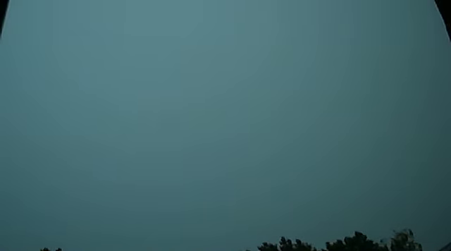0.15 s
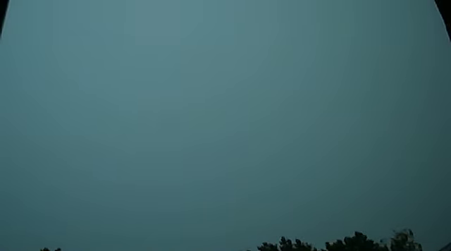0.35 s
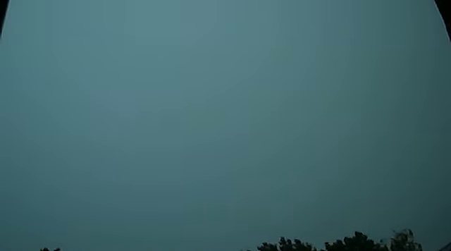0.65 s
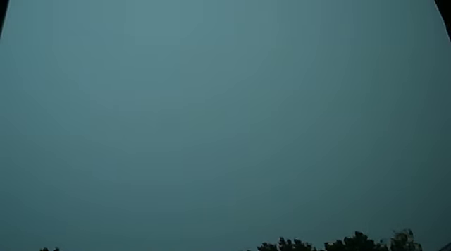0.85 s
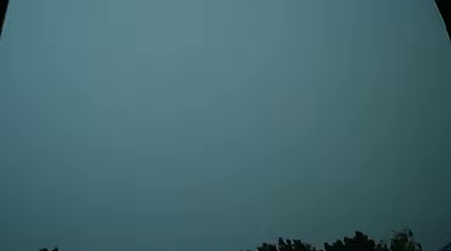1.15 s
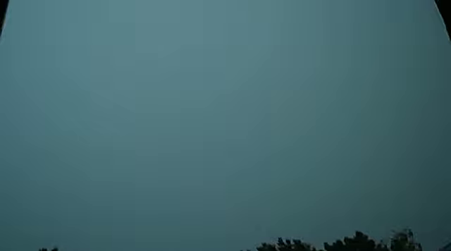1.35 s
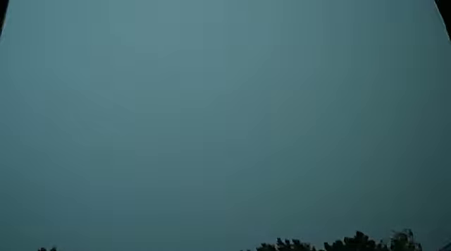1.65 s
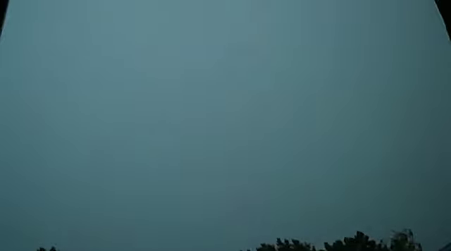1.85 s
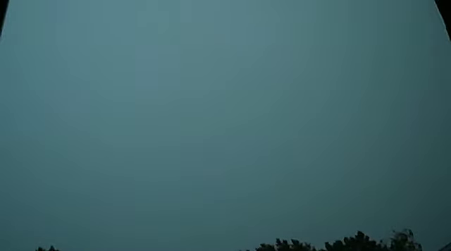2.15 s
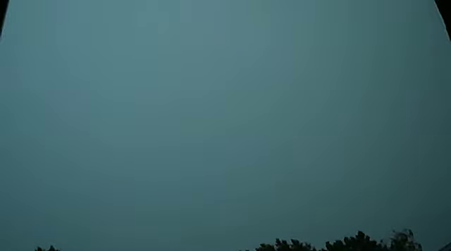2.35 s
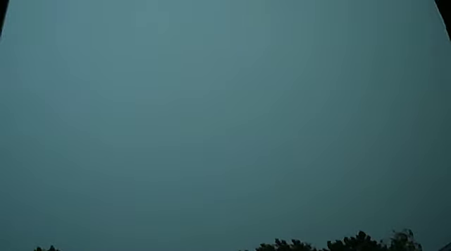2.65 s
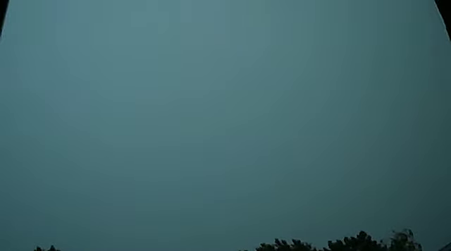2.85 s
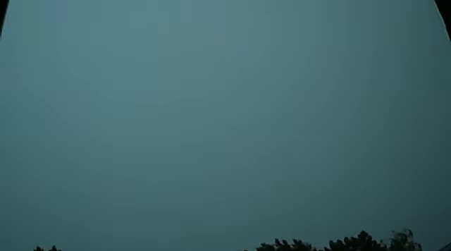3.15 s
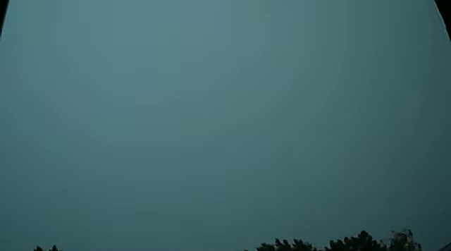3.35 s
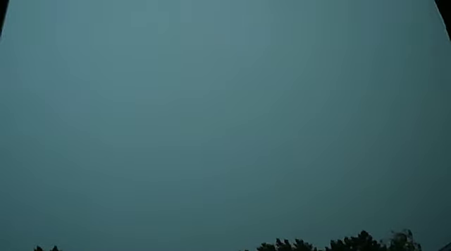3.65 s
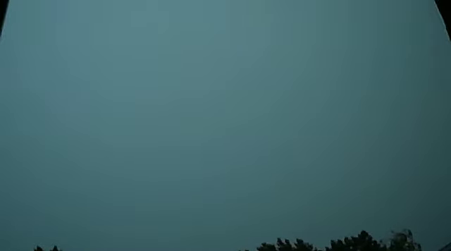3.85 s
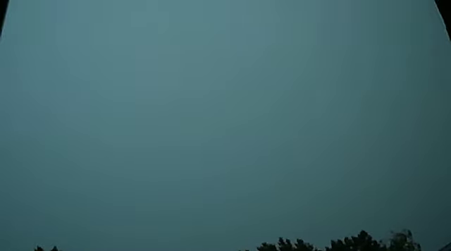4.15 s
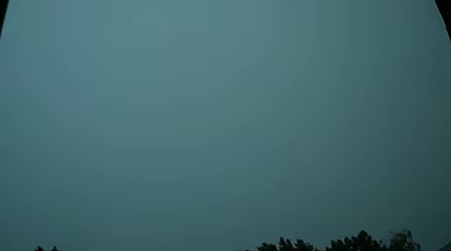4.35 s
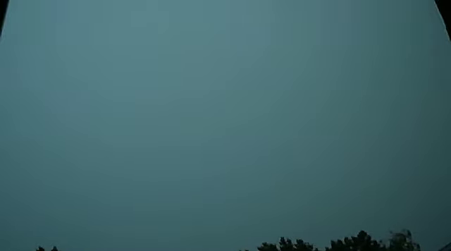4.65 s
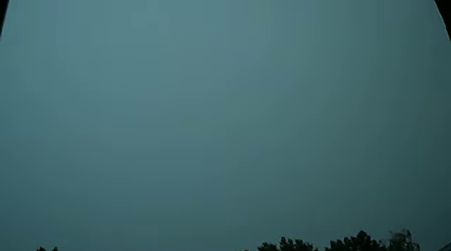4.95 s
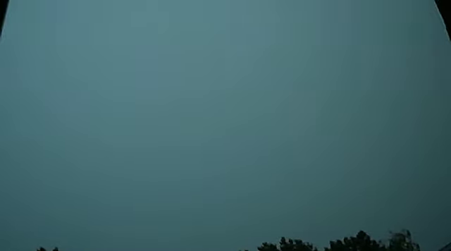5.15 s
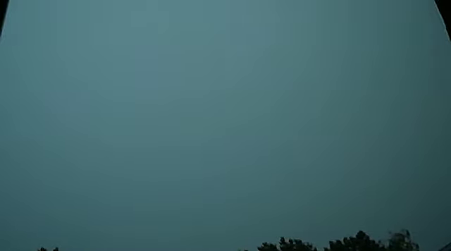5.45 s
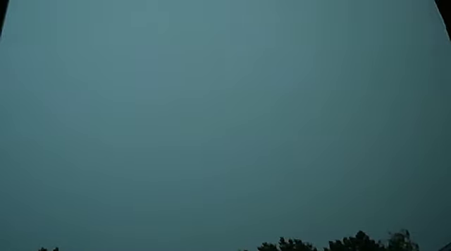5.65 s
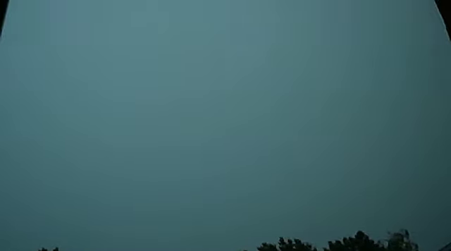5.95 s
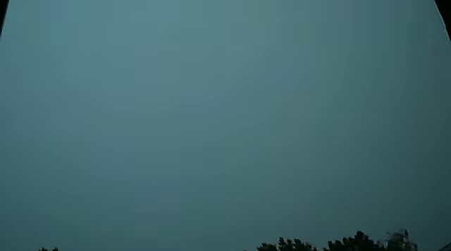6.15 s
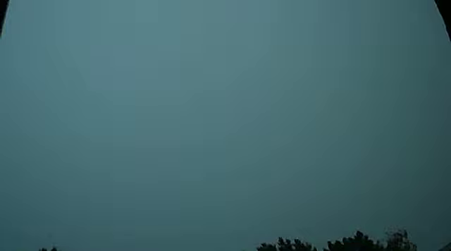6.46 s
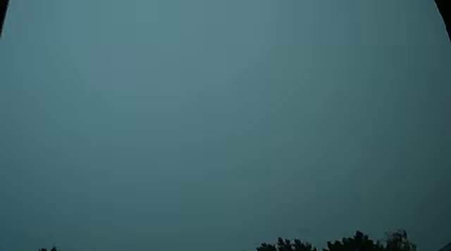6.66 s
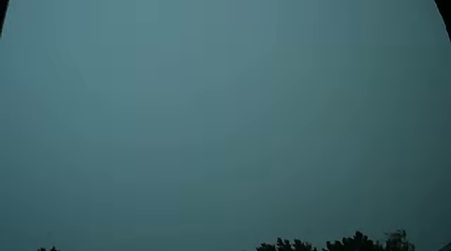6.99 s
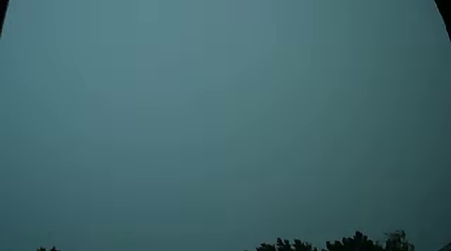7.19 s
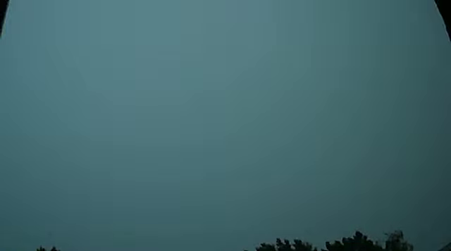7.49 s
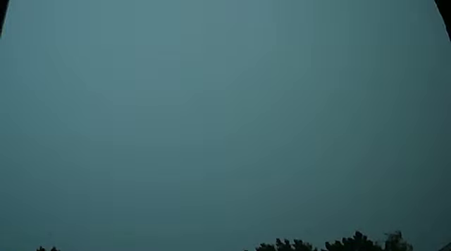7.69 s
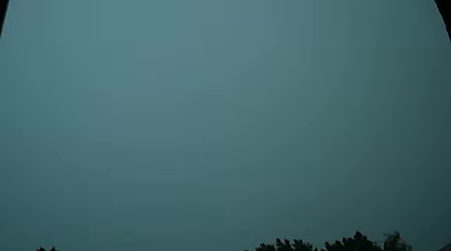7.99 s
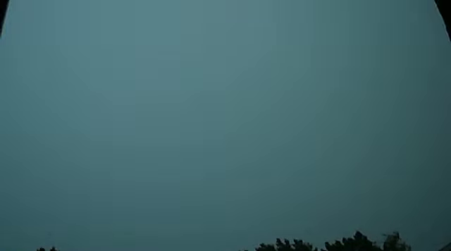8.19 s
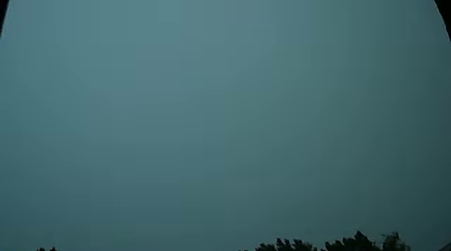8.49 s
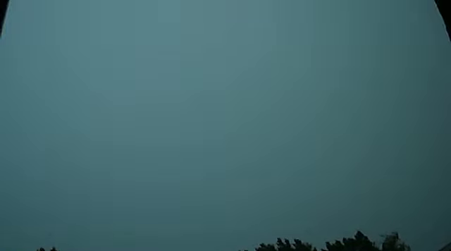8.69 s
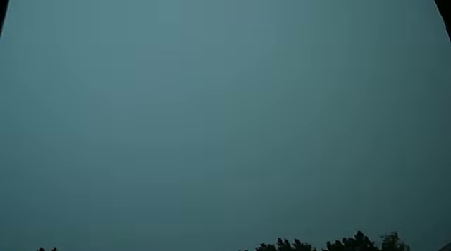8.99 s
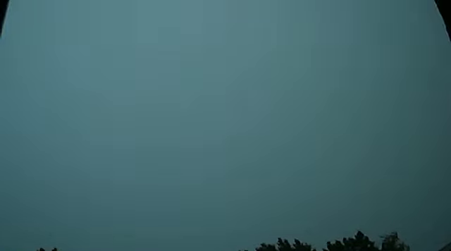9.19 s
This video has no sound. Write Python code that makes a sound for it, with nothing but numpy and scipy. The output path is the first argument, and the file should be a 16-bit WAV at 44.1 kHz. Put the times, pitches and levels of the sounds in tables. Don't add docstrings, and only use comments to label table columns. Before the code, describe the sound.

Steady rain hiss, faint ticks, then a long thunder roll swelling in peals to booming, overloaded claps before sinking with sharper cracks.

```python
import sys
import numpy as np
from scipy import signal
from scipy.fft import rfft, irfft, next_fast_len
from scipy.io import wavfile
from scipy.ndimage import uniform_filter1d

SR = 44100
rng = np.random.default_rng(int(sys.argv[2]) if len(sys.argv) > 2 else 0)


def unload_audio(sound):
    columns = np.transpose(np.atleast_2d(sound))
    steps = np.round(np.clip(columns, -1, 1) * 32767)
    wavfile.write(sys.argv[1], SR, steps.astype(np.int16))


def voltage_ratio(level):
    return 10 ** (np.asarray(level, float) / 20)


N = 411453

# (time of the peak [s], peak level [dB], pitch [Hz])
BOOMS = [(1.068, -23, 139), (1.272, -11, 96), (2.081, -12, 132), (2.504, -5, 140.6), (2.545, -6, 103.3),
         (2.602, -7.5, 116), (3.413, -8, 121.5), (3.515, -9.5, 58), (3.539, -7, 135), (4.594, 0.5, 58.3),
         (4.636, -5, 143.3), (4.707, -0.8, 61.6), (4.774, -0.5, 137), (4.822, 3, 58.7), (4.996, 5.5, 145.4),
         (5.437, 2, 51.8), (5.617, 7.5, 143.5), (5.997, 6.5, 94), (6.384, 5, 80.2), (6.676, 8.5, 109.6),
         (6.769, 2.5, 105.1), (7.004, 6, 81.2), (7.183, 10, 64.5), (7.279, 12, 73.2), (7.369, 10, 104.2),
         (7.5, 12, 144.4), (7.77, 3.5, 154), (7.84, 1, 157), (8.058, -5, 134), (8.382, -3, 154.8)]
# (time of the peak [s], peak level [dB], pitch [Hz])
CLAPS = [(0.424, -24, 164), (0.622, -22, 176), (0.986, -18, 164), (1.189, -9.5, 216), (1.306, -6.5, 250),
         (1.588, -10, 175), (1.647, -16, 164), (1.955, -14, 209), (2.653, 1.5, 288), (3.009, -1.5, 214),
         (3.143, 0.3, 217.6), (3.611, -1.5, 161.5), (3.678, -1.5, 264), (4.235, -0.5, 241.4),
         (4.262, -2, 198.6), (4.426, -4, 177), (4.563, 3.5, 209), (5.196, 2.5, 169), (5.218, 3.7, 190),
         (5.482, 4, 222.8), (5.657, 12, 249.2), (5.741, 10, 154.1), (5.79, 12, 203.2), (6.126, 4.5, 234.4),
         (6.518, 0, 232), (7.25, 10, 234.7), (7.325, 9.5, 166.7), (7.968, 1, 249.7), (8.354, 2.5, 224.5),
         (8.995, 1, 158)]
# (time of the peak [s], peak level [dB], pitch [Hz])
KNOCKS = [(0.142, -24, 700), (0.243, -25, 453), (0.274, -30, 589), (0.602, -26, 700), (1.69, -11, 417),
          (1.952, -15, 490), (2.62, -1.5, 388), (2.634, 0, 394), (2.742, 4.5, 360.5), (2.838, -8.5, 396),
          (3.001, -5, 466), (3.127, -3, 410), (3.208, -5, 260), (3.257, -7, 243), (3.704, -10, 620),
          (4.232, -7.5, 493), (7.112, 3.5, 444), (7.572, -0.5, 379.5), (7.978, -4.5, 397), (8.19, -6, 383),
          (8.295, -5, 436), (8.625, -6, 374), (8.773, -9, 438), (8.842, -4.5, 418), (8.904, -4, 452),
          (9.028, -0.1, 393), (9.081, -1.5, 481), (9.119, -4, 422), (9.187, -0.5, 424)]
# (time of the peak [s], peak level [dB], pitch [Hz])
SNAPS = [(2.641, 4.5, 353), (2.69, 2.5, 260), (2.863, 1, 377), (2.932, 0.5, 214.6), (3.175, 0, 228),
         (3.163, 0, 255.6), (3.596, -3, 292), (3.657, 2, 247), (4.747, 1.5, 185.6), (4.912, 3, 174.8),
         (4.997, 5, 181.7), (5.237, -0.5, 331), (5.316, 0.5, 226), (5.652, 7, 236.7), (5.78, 10.5, 225),
         (5.917, 6, 177), (6.02, 5.5, 220.3), (6.09, 2, 172.7), (6.14, 5, 230), (6.84, 6.5, 177),
         (7.04, 8.5, 179.8), (7.105, 2, 412), (7.536, 4.5, 458), (8.198, 0.2, 240), (8.357, 2, 219.7),
         (8.851, -1, 420), (8.948, 0.8, 561), (9.043, 5, 397), (9.098, 3.5, 168.7), (9.293, -4.5, 421)]
# (time of the peak [s], peak level [dB], pitch [Hz])
TICKS = [
    (.225, -31, 980),
    (.245, -34, 810),
    (.312, -28, 980),
    (.727, -28, 820),
    (.729, -34, 1480),
]


def claps():
    mix = thunder()
    fall_in_step(mix, BOOMS + CLAPS + KNOCKS, cycles=6.7, trim_db=-5.5)
    fall_in_step(mix, SNAPS, cycles=3.2, trim_db=-4.5)
    fall_in_step(mix, TICKS, cycles=13.0, trim_db=-1.0)
    fall_in_step(mix, lesser_claps(), cycles=6.0, trim_db=-6.0)
    return mix


# (time [s], roll level [dB], sharpness [dB])
ROLL = [(0.0, -41, 10.5), (0.75, -37.5, 9), (0.98, -23.5, 1), (1.4, -19.5, 3.5), (2.35, -25, 2.5),
        (2.6, -16.5, 5), (3.3, -15, 0.5), (3.9, -21, 4), (4.45, -15, -2), (4.72, -8.5, 0), (5.6, -5, -2),
        (6.35, -11, 0.5), (7.25, -1, 1), (7.7, -7.5, 0), (8.3, -15.5, 3), (8.56, -21, 6.5), (8.95, -14, 11),
        (9.33, -12.5, 7.5)]
# (frequency [Hz], level per Hz [dB])
ROLL_COLOUR = [(4, -16), (33, -8.5), (58, -1.5), (100, -1.5), (230, -2.5), (275, -7), (320, -12),
               (470, -14.5), (620, -16), (850, -19), (1150, -26), (1400, -35.5), (1800, -49.5), (2800, -67)]
SIZE_EDGES = [89.1, 321, 700]
# (frequency [Hz], width [Hz], level [dB])
PORCH = [
    (55.7, 18, 2),
    (154, 27, 2.3),
    (403.3, 65, 4.5),
]
# (time [s], swell level [dB], half length [s])
PEALS = [(0.2, 2.5, 0.094), (1.39, -0.5, .06), (1.61, 2.5, 0.042), (1.76, 0.5, .04), (2.64, 5.5, 0.037),
         (2.75, -2, 0.036), (2.93, 2, 0.061), (3.15, 5.5, 0.091), (3.49, 2, 0.034), (3.66, 7, 0.065),
         (3.92, 2, 0.036), (4.1, 3.5, 0.039), (4.32, 7.5, .06), (4.99, 1.5, 0.052), (5.065, -10.5, .045),
         (5.21, 1.5, 0.037), (5.53, 0.5, 0.077), (5.9, 6.5, 0.12), (6.03, -0.5, .04), (6.14, 5, .06),
         (6.63, -2, .04), (6.69, 5, 0.03), (7.38, 2, 0.078), (7.47, -1, 0.032), (7.53, 3.5, 0.06),
         (8.22, 3, 0.032), (8.37, 5.5, .04), (8.98, 0, .04), (9.11, 4, .04), (9.24, 3, 0.13)]
# (time [s], swell level [dB], half length [s])
HEAVES = [(0.2, 4, 0.25), (0.63, 7, .08), (1.28, 3.5, 0.062), (1.65, -3, 0.15), (1.85, 4, .04),
          (2.11, 3, 0.065), (2.21, -10, 0.06), (2.95, -10, 0.18), (3.49, 6.5, 0.087), (4.0, 6.5, 0.05),
          (4.29, 6.5, 0.088), (4.5, -5.5, 0.093), (4.78, 3.5, 0.11), (5.13, -5, .06), (5.39, 5.5, 0.037),
          (5.56, -6, .07), (5.95, 4, 0.089), (6.38, 11, 0.046), (6.64, -4, 0.026), (6.7, 11.5, 0.045),
          (6.86, 11, 0.056), (7.08, 9, .07), (7.38, 4.5, .07), (7.47, -5, 0.023), (7.76, 3.5, .05),
          (7.91, 6.5, .05), (8.35, 4.5, 0.09), (8.53, 4, 0.14), (8.98, 2.5, .05), (9.25, 3, .08)]
# (time [s], swell level [dB], half length [s])
TEARS = [(0.31, 2, .05), (0.73, 3, 0.064), (1.7, 3, 0.038), (2.31, 5.5, .05), (2.5, -4, 0.1),
         (2.64, 4.5, 0.048), (2.76, 3.5, .04), (2.87, 4.5, .06), (3.02, 3.5, 0.044), (3.19, 6, .04),
         (3.68, -1, .04), (4.57, 4.5, .04), (4.85, 2, .1), (5.09, -2.5, .04), (5.21, 1, 0.026),
         (5.44, -3, 0.089), (5.66, 4.5, 0.034), (5.79, 6, 0.036), (6.13, 1, 0.05), (6.66, -2, .04),
         (6.85, 5.5, .04), (7.15, 3, .06), (7.45, 2, .05), (7.97, 3, 0.035), (8.2, 3, 0.037),
         (8.37, 2, 0.026), (8.6, 1.5, 0.11), (8.78, 2.5, .03), (8.85, 2.5, .03), (9.04, 2, 0.022)]


def thunder():
    diffuse = rng.standard_normal(N)
    shocks = arrivals(1400, spread_db=2.4, tail_s=0.042) + 1.1 * diffuse
    shocks = coloured(shocks, lambda hz: shape(ROLL_COLOUR)(hz) * porch_boom(hz))
    below = [coloured(shocks, lambda hz: 1 / (1 + (hz / edge) ** 9)) for edge in SIZE_EDGES]
    deep, roll, crack, crackle = np.diff([0 * shocks] + below + [shocks], axis=0)
    crackle = through_air(crackle)

    t = np.arange(N) / SR
    s, roll_points, sharp_points = np.transpose(ROLL)
    roll_db = np.interp(t, s, roll_points)
    sharp_db = np.interp(t, s, sharp_points)
    peal_db, tear_db = swells(PEALS), swells(TEARS)

    deep_db = 2 + 0.5 * peal_db + swells(HEAVES)
    crack_db = 0.64 + 0.54 * peal_db + 0.88 * sharp_db + 0.9 * tear_db
    crackle_db = -3 + 0.8 * peal_db + 0.44 * sharp_db + 0.91 * tear_db
    crackle_db -= 0.33 * (roll_db + 11)

    mix = voltage_ratio(peal_db) * steadied(roll, 0.035, 0.96)
    mix += voltage_ratio(deep_db) * steadied(deep, 0.12, 1.0)
    mix += voltage_ratio(crack_db) * steadied(crack, 0.081, 0.16)
    mix += voltage_ratio(crackle_db) * steadied(crackle, 0.12, 0.67)
    return voltage_ratio(roll_db) * mix / np.std(roll)


def porch_boom(hz):
    return voltage_ratio(sum(db / (1 + (2 * (hz - f) / width) ** 2) for f, width, db in PORCH))


def through_air(crackle):
    top = coloured(crackle, lambda hz: 1 - 1 / (1 + (hz / 1150) ** 6))
    top_db = 7 - 1.43 * np.arange(N) / SR
    return crackle + (voltage_ratio(top_db) - 1) * top


def lesser_claps():
    per_s, over_roll_db, low_hz, high_hz = 7, 7.5, 139.4, 260
    start = np.arange(0.1, N / SR - .2, 1 / per_s)
    place, size, pitch = rng.random((len(start), 3)).T
    s = start + place / per_s
    roll_db = np.interp(s, *np.transpose(ROLL)[:2])
    peal_db = swells(PEALS)[(s * SR).astype(int)]
    db = roll_db + peal_db + over_roll_db + 4 * size
    return np.transpose([s, db, low_hz * (high_hz / low_hz) ** pitch])


def fall_in_step(mix, events, cycles, trim_db):
    for s, db, hz in events:
        u = np.arange(-cycles / 2, cycles / 2, hz / SR)
        part = mix[round(s * SR) - len(u) // 2:][:len(u)]
        burst = (np.exp(2j * np.pi * u) * np.hanning(len(u)))[:len(part)]
        in_step = np.exp(-1j * np.angle(burst @ part))
        part += voltage_ratio(db + trim_db) * (burst * in_step).real


# (frequency [Hz], level per Hz [dB])
RAIN_COLOUR = [(300, -11), (900, 10), (1500, 2.5), (2200, 1), (3000, 1), (3600, -2.5), (4700, -7.5)]
# (time [s], level [dB])
RAIN_SWELL = [(0, -1.5), (1, 0.5), (2, 3), (2.999, 2), (4.2, 1.5), (8, 2), (8.6, 2.1), (9.33, 5.5)]


def rain():
    drops = rng.standard_normal(N) + .5 * arrivals(1500, spread_db=1.6, tail_s=0.021)
    swell_db = np.interp(np.arange(N) / SR, *np.transpose(RAIN_SWELL))
    return voltage_ratio(-44 + swell_db) * evened(coloured(drops, shape(RAIN_COLOUR)))


def wind():
    swings = rng.standard_normal(N)
    return voltage_ratio(-42.5) * evened(coloured(swings, lambda hz: hz / (hz + 6) / (1 + (hz / 24) ** 4)))


def arrivals(per_s, spread_db, tail_s, count=8):
    t, out = np.arange(SR // 8) / SR, np.zeros(N)
    happens = rng.random(N) < per_s / SR
    size = voltage_ratio(spread_db * np.minimum(rng.exponential(1, N), 5)) * happens
    path = rng.integers(0, count, N)
    for k in range(count):
        tail = rng.standard_normal(len(t)) * voltage_ratio(-60 * t / tail_s)
        clicks = size * (path == k) * rng.choice([-1, 1], N)
        out += signal.oaconvolve(clicks, tail)[:N]
    return evened(out)


def swells(rows):
    t = np.arange(0, N, 64) / SR
    total_db = sum(db * np.exp(-((t - s) / half) ** 2) for s, db, half in rows)
    return np.interp(np.arange(N) / SR, t, total_db)


def steadied(x, span_s, share):
    span = int(span_s * SR)
    power = abs(uniform_filter1d(uniform_filter1d(x ** 2, span), span))
    swell = (power / np.mean(power) + 0.025) ** (np.clip(share, 0, 1) / 2)
    return np.std(x) * evened(x / swell)


def evened(x):
    return x / np.sqrt(np.mean(x ** 2) + 1e-20)


def coloured(x, gain):
    size = next_fast_len(len(x))
    hz = np.fft.rfftfreq(size, 1 / SR) + .01
    return irfft(rfft(x, size) * gain(hz), size)[:len(x)]


def shape(points):
    f, db = np.transpose(points)
    return lambda hz: voltage_ratio(np.interp(np.log(hz), np.log(f), db, left=-60, right=-80))


def scene():
    return (claps() + rain() + wind())[None]


def low_pass(x):
    return signal.sosfilt(signal.butter(12, 16100, fs=SR, output="sos"), x)


def record(dry):
    up, down = 441, 80
    first_clip, second_clip, offset = .706, .7071, .0055
    slow = signal.resample_poly(dry + offset, down, up, axis=1, padtype="reflect")
    slow = np.clip(slow, -first_clip, first_clip - .004)
    grain = rng.standard_normal(slow.shape) * (abs(slow) < .7)
    slow += voltage_ratio(-45.5) * abs(slow) ** .5 * grain
    smooth = signal.firwin(32 * up + 1, 4000, window=("kaiser", 9), fs=8000 * up)
    full = signal.resample_poly(slow, up, down, axis=1, window=smooth, padtype="reflect")[:, :N]
    ending = np.clip((N - np.arange(N)) / 160, 0, 1)
    return low_pass(ending * np.clip(full, -second_clip, second_clip))


dry = scene()
out = record(dry)
unload_audio(out)
```